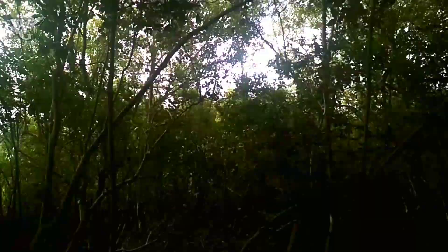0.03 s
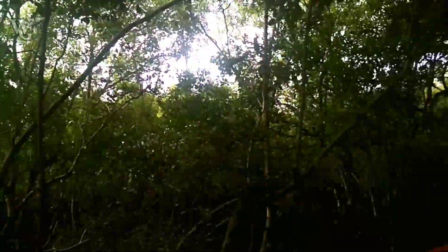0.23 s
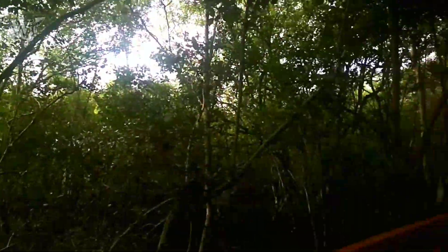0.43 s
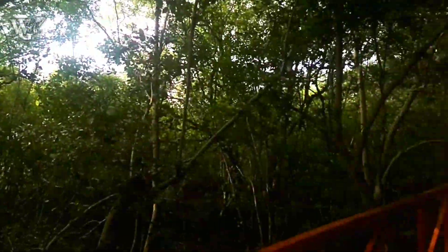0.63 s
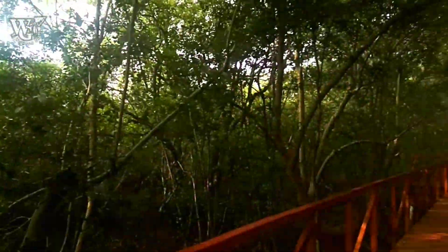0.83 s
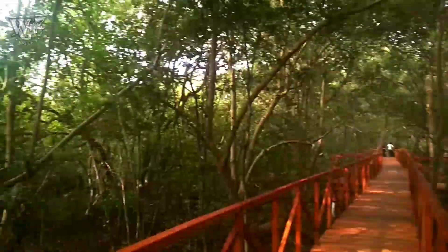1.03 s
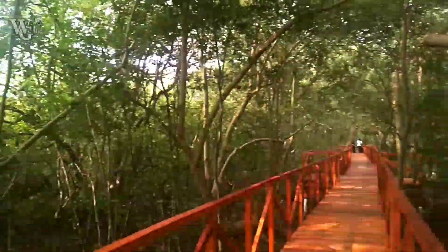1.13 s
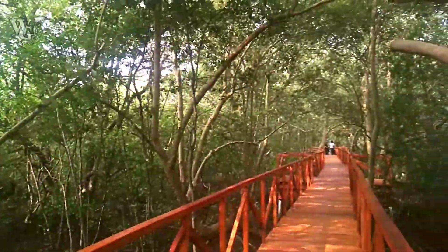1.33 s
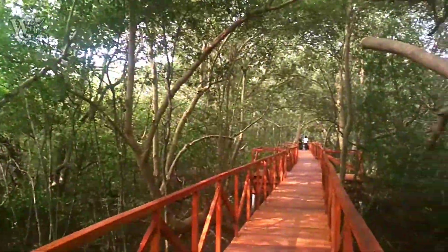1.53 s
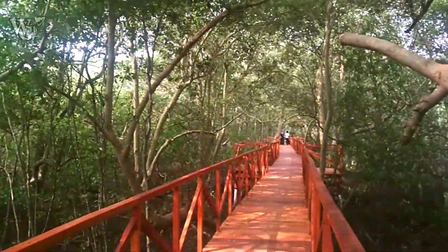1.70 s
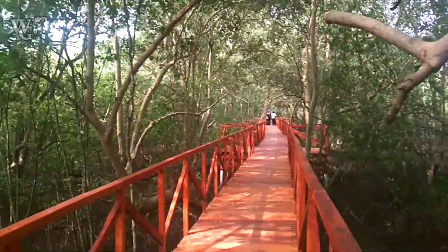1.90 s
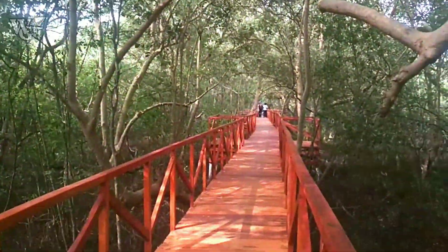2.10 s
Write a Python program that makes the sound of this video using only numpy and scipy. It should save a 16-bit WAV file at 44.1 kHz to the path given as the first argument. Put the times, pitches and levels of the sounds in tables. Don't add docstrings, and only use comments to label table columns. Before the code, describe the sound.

Low wind rumble and clipped gust thumps on a microphone outdoors, distant birds barely audible

```python
import sys
import numpy as np
from scipy import signal
from scipy.fft import rfft, irfft, next_fast_len
from scipy.io import wavfile
from scipy.ndimage import uniform_filter1d

SR = 44100
rng = np.random.default_rng(int(sys.argv[2]) if len(sys.argv) > 2 else 0)


def digitize_waveform(pressure):
    field = np.atleast_2d(pressure).T
    bounded = np.clip(field, -1, 1)
    quanta = np.round(bounded * 32767).astype(np.int16)
    wavfile.write(sys.argv[1], SR, quanta)


def elevation(decibels):
    levels = np.asarray(decibels, float)
    return 10 ** (levels / 20)


N = 95167

# (time [s], level [dB])
GUST_LEFT = [(0, -7.5), (.06, -12), (.115, -30), (.14, -56), (.16, -19), (.3, -10.5), (.52, -19.5),
             (.66, -13), (.78, -32), (.89, -31), (1.03, -24), (1.1, -6.5), (1.18, -18.5), (1.24, -30),
             (1.5, -25.5), (1.64, -30.5), (1.84, -25), (2.16, -23)]
GUST_RIGHT = [(0, -36), (.08, -42), (.2, -25), (.26, -28), (.33, -16.5), (.47, -26.5), (.55, -25),
              (.62, -21), (.7, -15.5), (.81, -23.5), (.9, -29.5), (1.08, -18), (1.25, -19.5), (1.32, -30.5),
              (1.4, -16), (1.6, -18.5), (1.97, -22.5), (2.16, -18.5)]
# (time [s], level [dB], length [s])
PUFFS_LEFT = [(.025, -7, 0.028), (.16, -8.5, 0.0089), (.192, -10.5, 0.027), (.445, -8, 0.031),
              (.489, -11, 0.042), (.569, -10, 0.079), (.627, -9, 0.082), (.698, -11.5, 0.022),
              (.912, -14.5, 0.0089), (.984, -17, 0.028), (1.045, -6, 0.01), (1.358, -21.5, 0.052),
              (1.495, -15.5, 0.032), (1.56, -19.5, 0.12), (1.71, -17.5, 0.047), (1.796, -22, 0.02),
              (1.919, -20, 0.033), (2.098, -47, 0.012)]
PUFFS_RIGHT = [(0.213, -18.5, 0.018), (0.434, -22.5, 0.012), (0.462, -13, 0.023), (0.645, -14, 0.023),
               (0.723, -19.5, 0.075), (0.933, -15.5, 0.13), (1.032, -11, 0.024), (1.205, -11.5, 0.017),
               (1.254, -14, 0.049), (1.401, -22, 0.02), (1.443, -13.5, 0.01), (1.52, -44.5, 0.016),
               (1.563, -18, 0.088), (1.562, -15.5, 0.033), (1.644, -11.5, 0.037), (1.693, -15, 0.0067),
               (1.83, -18, 0.25), (1.897, -12.5, 0.01), (1.95, -24.5, 0.012), (2.005, -18.5, 0.05),
               (2.043, -21.5, 0.069), (2.128, -24, 0.062)]
# (time [s], level [dB], length [s])
SLAMS_LEFT = [
    (.243, -1.5, .042),
    (.35, -.5, .05),
    (1.145, -5, .036),
]
# (time [s], peak [dB], swing [Hz], negative when the push comes first)
JOLTS_LEFT = [(.0075, 3, 105), (.0178, 0, 130), (.148, -1, -85), (.2248, 4, -200), (.237, 5, 128),
              (.2487, 3, -240), (.2535, 4, 105), (.336, 4.5, 75), (.3423, 4, 200), (.3515, 3.5, 130),
              (.3598, 4, -130), (.3712, 3, 240), (.439, -3, 100), (.6256, -1.5, -150), (1.069, 1.5, -150),
              (1.097, -4, -110), (1.1345, 4, 100), (1.154, 2.5, -120), (1.875, -3, 125)]
JOLTS_RIGHT = [(.3635, -.5, 150), (.4937, 3, 147), (.6428, -4, -140), (.979, -2.5, 155), (1.0583, 1, 175),
               (1.1705, 3, 250), (1.649, -3, 155), (1.739, -1, 108), (1.7774, 2.3, 170), (2.004, -5, -125),
               (2.1305, -6.5, 200)]
# (time [s], level [dB], length [s])
FLUTTERS_LEFT = [(.007, -16, 0.0087), (.155, -26.5, 0.017), (.252, -3.5, 0.0065), (.3, -29, 0.23),
                 (.341, -15, 0.014), (.362, -3.5, 0.011), (.436, -24.5, 0.033), (.6, -28.5, .03),
                 (.62, -17, 0.014), (1.107, -50, 0.019), (1.16, -21, 0.07)]
FLUTTERS_RIGHT = [(.22, -22.5, 0.019), (.465, -29, .01), (.497, -20, 0.018), (.642, -25, .013),
                  (.7, -21, 0.038), (.74, -23, 0.04), (.885, -23, 0.019), (.916, -17.5, 0.013),
                  (.98, -18.5, 0.0096), (1.036, -24.5, 0.018), (1.062, -23.5, 0.024), (1.103, -20.5, 0.016),
                  (1.17, -16, 0.0086), (1.4, -25, 0.023), (1.546, -18.5, 0.0081), (1.612, -21.5, 0.008),
                  (1.779, -19.5, 0.0066), (1.649, -17.5, 0.015), (1.7, -21.5, 0.0033),
                  (1.838, -21.5, 0.034), (1.913, -39.5, 0.0056), (1.997, -22, 0.0062)]
# (frequency [Hz], density [dB per Hz])
THUMP_COLOUR = [(15, -31), (25, -7), (50, -3), (85, 1), (118, 0.5), (165, -5), (250, -10), (340, -20),
                (430, -40.5)]
FLUTTER_COLOUR = [(220, -10), (330, 6), (450, -1.5), (650, -12), (850, -28), (1050, -50), (2000, -64),
                  (3500, -76)]
# (time [s], length [s], from [Hz], to [Hz], level [dB], left-right [dB])
WHISTLES = [(0.272, 0.021, 7900, 7610, -59.5, 10), (0.285, 0.018, 7500, 5740, -44, 3.5),
            (0.581, 0.011, 7640, 4650, -45.5, 8), (.583, 0.013, 6800, 6920, -55, 3),
            (.584, 0.011, 5430, 5380, -51, 7), (1.0317, 0.054, 7700, 5230, -36.5, 11.5),
            (1.351, 0.035, 7670, 7250, -58, 17.5), (1.393, 0.054, 7710, 6480, -46.5, 14),
            (1.412, 0.025, 6260, 5770, -51.5, 19), (1.423, 0.014, 5560, 5110, -46.5, 8),
            (1.15, 0.05, 2966, 1973, -46.5, 14.5), (1.19, 0.041, 2990, 2170, -54, 17),
            (1.091, .08, 7660, 5990, -46.5, 12.5), (1.135, .03, 2314, 2890, -47.5, 19),
            (1.22, 0.035, 2303, 2870, -62, 6.5), (-.025, 0.047, 1751, 1387, -39, 8),
            (-.02, 0.048, 1926, 2570, -53, 21.5), (-.005, 0.035, 4130, 3976, -64.5, 8),
            (.012, 0.02, 2410, 2700, -51, 19)]
# (time [s], level [dB])
CICADA = [(0, -73.5), (.09, -76), (.11, -55.5), (.15, -71.5), (.56, -85.5), (.61, -61), (.78, -66),
          (.85, -56.5), (.92, -72), (1, -52.5), (1.05, -60.5), (1.26, -105), (1.29, -58.5), (1.5, -55.5),
          (1.57, -48), (1.75, -51.5), (1.9, -100), (1.945, -58)]
# (centre [Hz], width [Hz], level [dB])
CHORUS = [(11060, 160, -81), (11510, 280, -79.5), (12250, 300, -80), (12600, 300, -87), (13050, 150, -84),
          (13500, 200, -91.5), (14200, 400, -84.5), (15050, 500, -86.5)]
# (time [s], level [dB])
CHORUS_SWELL = [(0, -0.5), (.4, -7.5), (.7, 0), (1.5, 3.5), (2.16, -2)]
# (frequency [Hz], density [dB per Hz])
LEAVES_COLOUR = [(500, 1.5), (1000, 6), (2000, -3.5), (3500, -9), (7500, -14), (9500, -12.5),
                 (13000, -15.5), (16000, -38)]
# (time [s], level [dB])
LEAVES_SWELL = [(0, -4), (1.0, 0), (1.8, 1.5), (2.04, 2.5), (2.16, 7)]
# (time [s], level [dB], length [s])
RATTLES = [
    (.156, -49.5, 0.022),
    (.24, -32, 0.038),
    (.35, -32.5, 0.057),
    (.445, -47, 0.022),
    (.64, -54, .03),
    (1.15, -37.5, 0.049),
]
# (frequency [Hz], density [dB per Hz])
RATTLE_COLOUR = [(400, -27), (700, 4.5), (1300, -7), (2500, -19.5), (5000, -33), (9000, -44.5)]
# (time [s], peak [dB], left-right [dB], decay T60 [s], ring
# [Hz])
TICKS = [
    (1.8134, -44, -16, .0015, 1200),
    (1.909, -34, -14, .018, 850),
    (1.9925, -29, -14, .022, 900),
    (2.1428, -33, -16, .007, 2350),
]

EVENNESS, EVEN_S, PUFF_SHARPNESS = 0.5, 0.026, 2.81
JOLT_CYCLES, JOLT_LEAN_RAD = .5, .6
GUST_FLUTTER_DB, FLUTTER_LUMPS_DB, FLUTTER_FOLLOWS = [-23, -10], 3, 1.36
WHISTLE_FADE_DB, OVERTONE_DB, WARBLE_SHARE = -15, -26, .012
CALL_LEAD_S, DIRECT_DB = .06, -10
FOREST_BUILD_S, FOREST_T60_S, FOREST_FALL = .014, .22, 1.4
CICADA_HZ, CICADA_WIDTH_HZ, CICADA_THROB_DB = 8456, 130, 4
CICADA_LEFT_RIGHT_DB = [[4], [-26.5]]
LEAVES_DB = -65.5
TICK_RISE, TICK_HISS_DB, TICK_HISS_LASTS = .12, -16.5, 2
CEILING, KNEE = 1.03, 55


def in_time(rows):
    s, value = np.transpose(rows)
    return np.interp(np.arange(N) / SR, s, value)


def rms_one(x):
    return x / np.sqrt(np.mean(x ** 2))


def coloured(spectrum):
    hz, db = np.transpose(spectrum)
    log_bins = np.log(np.arange(N // 2 + 1) * SR / N + 1)
    gain = elevation(np.interp(log_bins, np.log(hz), db, left=-60, right=-99))
    return rms_one(irfft(rfft(rng.standard_normal((2, N))) * gain, N))


def drift(rate_hz):
    sos = signal.butter(2, rate_hz, fs=SR, output="sos")
    return rms_one(signal.sosfilt(sos, rng.standard_normal(N + SR))[SR:])


def narrow(hz, width_hz):
    sos = signal.butter(2, [hz - width_hz / 2, hz + width_hz / 2], "band", fs=SR, output="sos")
    return rms_one(signal.sosfilt(sos, rng.standard_normal((2, N))))


def evened(x):
    envelope = np.abs(signal.hilbert(x, next_fast_len(N))[:, :N])
    return rms_one(x / uniform_filter1d(envelope, int(EVEN_S * SR)) ** EVENNESS)


def bells(rows):
    t = np.arange(N) / SR
    return sum(elevation(db) ** 2 * np.exp(-np.abs(PUFF_SHARPNESS * (t - s) / length) ** 3)
               for s, db, length in rows)


def wind():
    left = elevation(in_time(GUST_LEFT)) ** 2 + bells(PUFFS_LEFT + SLAMS_LEFT)
    right = elevation(in_time(GUST_RIGHT)) ** 2 + bells(PUFFS_RIGHT)
    thump_power = np.array([left, right])
    lumps_power = np.array([elevation(db + FLUTTER_LUMPS_DB * drift(25)) ** 2 for db in GUST_FLUTTER_DB])
    flutter_power = lumps_power * thump_power ** FLUTTER_FOLLOWS
    flutter_power += [bells(FLUTTERS_LEFT), bells(FLUTTERS_RIGHT)]
    thump = np.sqrt(thump_power) * evened(coloured(THUMP_COLOUR))
    flutter = np.sqrt(flutter_power) * evened(coloured(FLUTTER_COLOUR))
    return jolts(thump) + flutter


def jolts(thump):
    t, out = np.arange(N) / SR, thump.copy()
    for port, rows in enumerate([JOLTS_LEFT, JOLTS_RIGHT]):
        for s, db, hz in rows:
            bell = np.exp(-((t - s) * hz / JOLT_CYCLES) ** 2)
            swing = np.sin(2 * np.pi * hz * (t - s) + JOLT_LEAN_RAD)
            out[port] = out[port] * (1 - np.sqrt(bell)) + elevation(db) * bell * swing
    return out


def birds():
    lead = int(CALL_LEAD_S * SR)
    calls, warble = np.zeros((2, N)), 1 + WARBLE_SHARE * drift(520)
    for s, length, from_hz, to_hz, db, pan_db in WHISTLES:
        u = np.linspace(0, 1, int(length * SR))
        start = int(s * SR) + lead
        span = slice(start, start + len(u))
        phase = 2 * np.pi * np.cumsum((from_hz + (to_hz - from_hz) * u) * warble[span]) / SR
        tone = np.sin(phase) + elevation(OVERTONE_DB) * np.sin(2 * phase)
        tone *= np.sqrt(np.abs(np.sin(np.pi * u)))
        calls[:, span] += elevation(db + WHISTLE_FADE_DB * u + [[pan_db / 2], [-pan_db / 2]]) * tone
    t = np.arange(SR // 2) / SR
    decay = elevation(-60 * (t / FOREST_T60_S) ** FOREST_FALL)
    scatter = rng.standard_normal((2, len(t))) * decay * (1 - np.exp(-t / FOREST_BUILD_S))
    scatter /= np.sqrt(np.sum(scatter ** 2) / 8)
    echoed = signal.fftconvolve(calls, scatter, axes=1)[:, lead:N + lead]
    return echoed + elevation(DIRECT_DB) * np.roll(calls, -lead, axis=1)


def insects():
    effort_db = in_time(CICADA) + CICADA_THROB_DB * drift(37) + CICADA_LEFT_RIGHT_DB
    cicada = elevation(effort_db) * narrow(CICADA_HZ, CICADA_WIDTH_HZ)
    chorus = sum(elevation(db + 5.5 * drift(7.2)) * narrow(hz, width_hz) for hz, width_hz, db in CHORUS)
    return cicada + elevation(in_time(CHORUS_SWELL) + [[3], [-1]]) * chorus


def leaves():
    return elevation(LEAVES_DB + in_time(LEAVES_SWELL) + 2.0 * drift(24)) * coloured(LEAVES_COLOUR)


def rattle():
    grain = elevation(4.05 * drift(100)) * coloured(RATTLE_COLOUR)
    return np.sqrt(bells(RATTLES)) * grain * [[1], [0]]


def ticks():
    t, out, noise = np.arange(N) / SR, np.zeros((2, N)), rng.standard_normal(N)
    for s, db, pan_db, t60, hz in TICKS:
        age = np.abs(t - s)
        ring = elevation(-60 * age / t60) * (1 - np.exp(-age / (TICK_RISE * t60)))
        ring *= np.cos(2 * np.pi * hz * age)
        hiss = elevation(TICK_HISS_DB - 60 * age / (TICK_HISS_LASTS * t60)) * noise
        hiss *= (hz / 2400) ** 4
        out += (t > s) * elevation(db + np.array([[pan_db / 2], [-pan_db / 2]])) * (ring + hiss)
    return out


def scene():
    return wind() + birds() + insects() + leaves() + rattle() + ticks()


def roll_off(x):
    return signal.sosfilt(signal.butter(12, 15700, fs=SR, output="sos"), x)


def record(dry):
    rounded = CEILING * dry / (1 + np.abs(dry) ** KNEE) ** (1 / KNEE)
    return roll_off(np.clip(rounded, -1, 1))


dry = scene()
out = record(dry)
digitize_waveform(out)
```